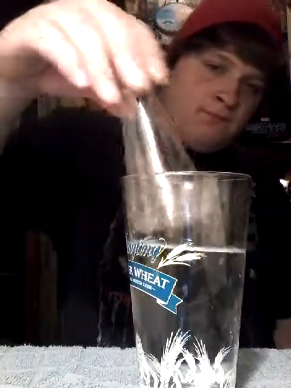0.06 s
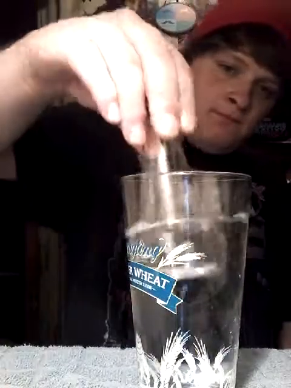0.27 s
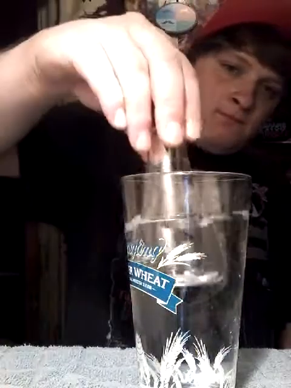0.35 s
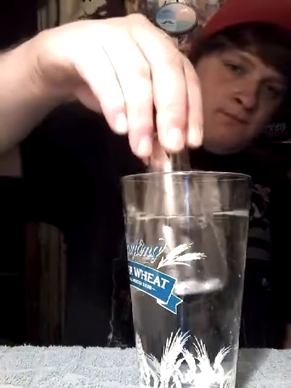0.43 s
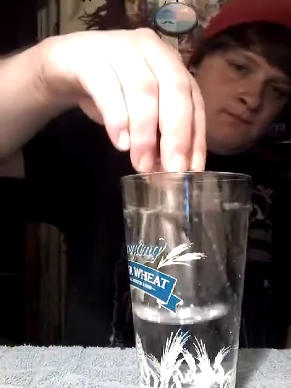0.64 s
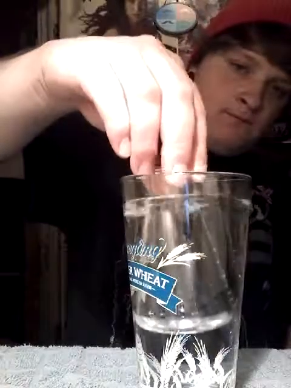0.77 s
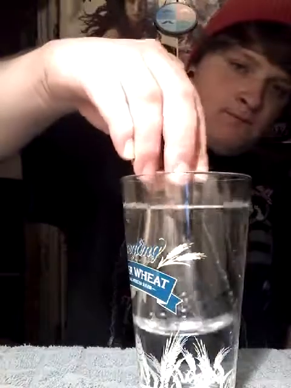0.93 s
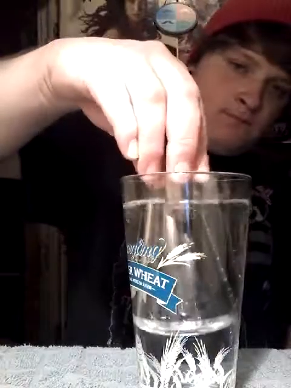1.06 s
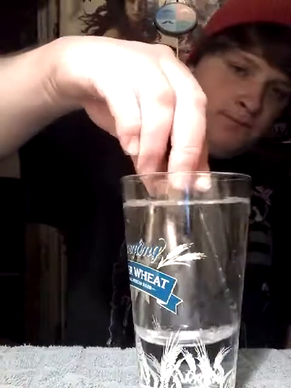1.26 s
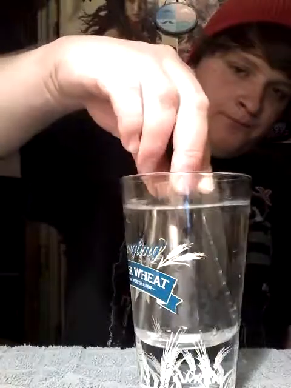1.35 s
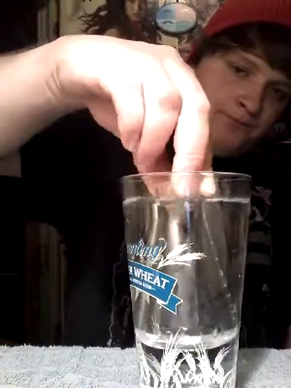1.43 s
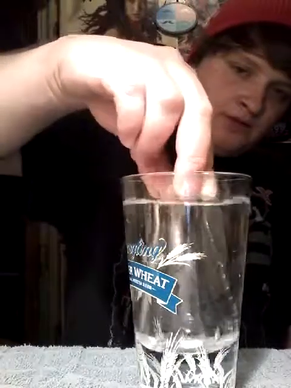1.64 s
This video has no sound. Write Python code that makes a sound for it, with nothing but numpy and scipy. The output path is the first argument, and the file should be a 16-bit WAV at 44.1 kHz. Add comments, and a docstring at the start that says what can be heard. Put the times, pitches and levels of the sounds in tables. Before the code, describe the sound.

One short, chattering glass clink, then soft water gurgles and bubbles in a quiet room.

```python
"""A flask pushed into a glass of water

A small glass flask sinks into a drinking glass of water, clinks on the wall and chatters a few times.
The rising water bends the glass's ringing note down and chokes it; sloshes, fizz, gurgles and a few
small bubbles follow. Behind it a small room hisses quietly, with a low boom that swells and fades."""
import sys
import numpy as np
from scipy import signal
from scipy.fft import rfft, irfft, next_fast_len
from scipy.io import wavfile
from scipy.ndimage import map_coordinates

SR = 44100
rng = np.random.default_rng(int(sys.argv[2]) if len(sys.argv) > 2 else 0)


def output_pcm(signal):
    """Save a mono or channel-first signal as 16-bit PCM at the path in sys.argv[1].

    Samples are clipped to [-1, 1] before scaling.
    """
    pcm = np.clip(np.atleast_2d(signal).T, -1, 1) * 32767
    wavfile.write(sys.argv[1], SR, np.round(pcm).astype(np.int16))


N = 74970

# each touch of flask on glass: t/s, knock/dB, chink/dB, rattle/dB, crack/dB, crack's treble cutoff/Hz
TOUCHES = [(0.2250, -13.5, -30.5, -51, -22.5, 8930), (0.2318, -28.5, -47, -47, -32, 14000),
           (0.2400, -32, -38.5, -41, -33, 15000), (0.2517, -24.5, -50, -34, -30, 4060),
           (0.2623, -22, -50, -36, -30, 4100), (0.2681, -30, -45, -36, -34.5, 5170),
           (0.2734, -35, -47, -34.5, -26, 3000), (0.2803, -38, -56.5, -33, -32, 3000),
           (0.2920, -48, -47.5, -34.5, -29.5, 15200), (0.3325, -51, -56, -53, -48, 4000)]
ATTACK_S, SHARP_ATTACK_S = 0.0004, 0.0002
CHOKE_AT_S = 0.3103  # the water starts to smother the ringing


def clinks():
    """Each touch of the flask on the glass gives a hollow knock, a high chink, a rattle and a crack."""
    # hollow notes of the held flask and the water: f/Hz, level/dB, t60/s (time to fade by 60 dB)
    knock_notes = [(790, -17.5, .06), (903, -18, 0.071), (988, -0.5, 0.064), (1039, 2.5, 0.0203),
                   (1290, -5, 0.04), (1310, -37, 0.022)]
    # high notes of the glass walls: f/Hz, level/dB, t60/s
    chink_notes = [(3255, -3, 0.045), (3996, -19, 0.17), (4380, -1.5, 0.072), (4440, -14, .04),
                   (4772, -12.5, 0.16), (5204, -8, 0.049), (5410, -3.5, 0.035), (5800, -13, 0.026),
                   (6400, -17.5, 0.06), (6810, -10.5, .035), (7520, -9.5, 0.037)]
    # notes of the flask's wall as it rattles along the glass: f/Hz, level/dB
    rattle_notes = [(2550, -6), (2810, -4), (2900, -2), (3190, -7.5), (3310, -8.5)]
    # tone colour of the crack: f/Hz, level/dB
    crack_colour = [(40, -45), (110, -24), (200, -9), (400, 10), (660, 0), (850, -6), (1200, -1),
                    (1650, -17), (2200, -1), (2900, 0), (4000, -2.5), (5500, -4.5), (8500, -13),
                    (12000, -2.5), (16000, -9.5)]
    rattle_t60_s, pitch_spread = 0.042, 0.014
    out, t = np.zeros(N), clock()[:SR // 3]
    for s, knock_db, chink_db, rattle_db, crack_db, cutoff_hz in TOUCHES:
        knock = amp(knock_db) * ring(knock_notes, t, ATTACK_S, scatter_db=0.5)
        chink = amp(chink_db) * ring(chink_notes, t, SHARP_ATTACK_S, scatter_db=1.2)
        # the touching point moves, so each rattle is tuned a little differently
        shifted = [(hz * (1 + pitch_spread * rng.normal()), db, rattle_t60_s) for hz, db in rattle_notes]
        rattle = amp(rattle_db) * ring(shifted, t, ATTACK_S, scatter_db=1.2)
        burst = filtered(noise(crack_colour), lambda hz: 1 / np.sqrt(1 + (hz / cutoff_hz) ** 4))
        crack = amp(crack_db) * unit(burst)[:len(t)] * struck(t, SHARP_ATTACK_S, t60=0.018)
        out[round(s * SR):][:len(t)] += knock + chink + rattle + crack
    return out


def glass_note():
    """The knocks set the glass ringing; the rising water bends the note down and chokes it."""
    note_hz, sag_hz, t60_s, choke_db_per_s = 1860, 83, 0.31, 522
    first_db = TOUCHES[0][1]
    first, *later = [amp(db - first_db) * struck(clock(s), ATTACK_S, t60_s) for s, db, *_ in TOUCHES]
    level = (first + 0.66 * sum(later)) * amp(-24.5 - choke_db_per_s * clock(CHOKE_AT_S))
    water_height = (1 + np.tanh((clock() - 0.303) / 0.0166)) / 2  # climbs from 0 to 1 around 0.303 s
    return level * tone(note_hz - sag_hz * water_height)


def air_hum():
    """The air in the glass hums briefly, kept going by the chatter."""
    hum_hz, t60_s, choke_db_per_s = 492.8, 0.21, 69
    first, *later = [struck(clock(s), ATTACK_S, t60_s) for s, *_ in TOUCHES]
    level = (first + 0.19 * sum(later)) * amp(-35.5 - choke_db_per_s * clock(CHOKE_AT_S))
    return level * tone(np.full(N, hum_hz))


def sloshes():
    """Water shoved aside by the flask makes soft swells of low noise."""
    # each slosh: t/s, half length/s, level/dB
    swells = [(0.28, .025, -38.5), (0.55, 0.016, -49), (1.055, 0.015, -52), (1.607, 0.0085, -47.5),
              (1.645, 0.0114, -54.5), (1.677, 0.024, -53)]
    # tone colour of a slosh: f/Hz, level/dB
    colour = [(30, -35), (45, 2), (80, -9.5), (200, -2), (400, -0.5), (700, -9.5), (1300, -13),
              (2500, -19.5), (5000, -38.5), (15000, -28)]
    return noise(colour) * sum(amp(db) * swell(s, half) for s, half, db in swells)


def fizz():
    """The stirred water fizzes faintly."""
    # each swell of fizz: t/s, half length/s, level/dB
    swells = [(0.395, 0.034, -54.5), (0.57, 0.22, -62)]
    # tone colour of the fizz: f/Hz, level/dB
    colour = [(300, -40), (900, -8), (1300, -2.5), (1900, -8), (2180, 3.5), (2500, -14), (4500, -19.5),
              (5400, -17), (6200, -38), (15000, -18)]
    return noise(colour) * sum(amp(db) * swell(s, half) for s, half, db in swells)


def gurgles():
    """The sinking flask makes short hollow notes that waver in pitch."""
    # each gurgle: t/s, half length/s, f/Hz, level/dB
    notes = [(0.651, .03, 387, -50.5), (0.82, 0.028, 624, -58), (0.992, 0.0313, 613, -55.5),
             (1.157, 0.027, 579.3, -55), (1.377, 0.034, 491.5, -53)]
    wander_hz = 11.3
    return sum(amp(db) * swell(s, half) * tone(hz + wander_hz * wobble(rate=70.76))
               for s, half, hz, db in notes)


def bubbles():
    """Each small bubble rings briefly while its pitch rises."""
    # each bubble: t/s, starting f/Hz, level/dB, t60/s
    notes = [(1.289, 3600, -52, 0.015), (1.5745, 2053, -40, 0.012), (1.680, 555, -41, 0.104)]
    rise_per_s = 4.3  # as a share of the starting pitch
    out = np.zeros(N)
    for s, hz, db, t60 in notes:
        t = clock(s)
        out += amp(db) * struck(t, ATTACK_S, t60) * tone(hz * (1 + rise_per_s * t))
    return out


def room_echo(x):
    """The small room answers x after 4 ms with an echo whose high notes last longest."""
    # how long the echo lasts: f/Hz, t60/s
    fade_times = [(200, 0.19), (1500, 0.23), (5000, 0.37), (14000, 0.75)]
    hz, t, spectrum = signal.stft(rng.standard_normal(SR // 2), SR, nperseg=256)
    fade = amp(-60 * t / along(fade_times, hz)[:, None])
    _, tail = signal.istft(spectrum * fade, SR, nperseg=256)
    delayed = np.pad(tail, (SR // 250, 0)) / np.linalg.norm(tail)
    return signal.fftconvolve(x, delayed)[:N]


def boom():
    """One low, wavering note swells and fades in the background."""
    # rise and fall of the boom: t/s, relative level/dB
    levels = [(0.0, -49), (0.028, -45), (0.06, -62), (0.112, -54), (0.174, -78), (0.268, -43.5),
              (0.322, -43), (0.41, -44), (0.464, -61), (0.558, -45.5), (0.596, -62), (0.62, -49.5),
              (0.748, -71), (0.794, -51), (0.912, -49), (0.984, -63.5), (1.064, -52), (1.088, -65),
              (1.168, -54), (1.24, -68), (1.348, -49.5), (1.434, -56.5), (1.452, -68), (1.528, -42.5),
              (1.586, -58.5), (1.666, -49), (1.7, -81)]
    boom_hz, wander_hz, gain_db = 108.5, 4.7, 1.95
    return amp(gain_db + curve(levels)) * tone(boom_hz + wander_hz * wobble(rate=34.7))


def room_noise():
    """A quiet hiss wavers in level, and a low rumble follows it more gently."""
    # rise and fall of the hiss: t/s, relative level/dB
    levels = [(0, 2), (.03, 4), (.1, -1), (.2, 0.5), (.3, 12), (.41, 4), (.47, 1), (.55, 4), (.65, 3),
              (.72, -3.5), (.77, -0.5), (.81, 3), (.92, 3.5), (1.0, -1), (1.17, 1), (1.26, -2.5),
              (1.37, 2.5), (1.46, -3.5), (1.53, 3.5), (1.7, -0.5)]
    # tone colour of the hiss: f/Hz, level/dB
    hiss_colour = [(150, 2), (500, 1), (720, -9), (1050, -1), (1350, -1.5), (1650, -6), (2200, -7),
                   (3000, -11.5), (4300, -19), (7000, -21), (11000, -16.5), (14000, -18), (15800, -25)]
    # tone colour of the rumble: f/Hz, level/dB
    rumble_colour = [(25, -39), (42, -42), (54, -6.5), (75, -2), (110, -17.5), (150, -3.5), (190, -2.5),
                     (235, -4), (290, 5), (345, 2.5), (420, -7.5), (490, -5), (600, -13), (750, -16),
                     (1000, -60), (2000, -63.5)]
    swing_db = curve(levels)
    hiss = amp(-59 + swing_db) * noise(hiss_colour)
    rumble = amp(-55.5 + 0.69 * swing_db) * noise(rumble_colour)
    return hiss + rumble


def amp(db):
    """Turns decibels into a number to multiply by."""
    return 10 ** (np.asarray(db) / 20)


def unit(x):
    """Scales x to an average strength (rms) of 1."""
    return x / np.sqrt(np.mean(x ** 2) + 1e-20)


def clock(start=0):
    """Seconds since start, zero before it."""
    return np.maximum(np.arange(N) / SR - start, 0)


def along(points, hz):
    """Reads between (f/Hz, value) points, with octaves evenly spaced."""
    f, values = np.transpose(points)
    return np.interp(np.log(hz + 1), np.log(f + 1), values)


def curve(points):
    """Joins (t/s, value) points with straight lines."""
    return np.interp(clock(), *np.transpose(points))


def wobble(rate):
    """A smooth curve through `rate` random values a second."""
    return map_coordinates(rng.standard_normal(1000), [clock() * rate], mode="wrap")


def filtered(x, response):
    """Scales each frequency in x by response(hz)."""
    size = next_fast_len(N + SR // 2)
    return irfft(rfft(x, size) * response(np.fft.rfftfreq(size, 1 / SR)), size)[:N]


def noise(colour):
    """Noise of strength 1 with the given tone colour."""
    return unit(filtered(rng.standard_normal(N), lambda hz: amp(along(colour, hz))))


def struck(t, attack, t60):
    """The level after a blow: a quick rise, then a fall of 60 dB every t60 seconds."""
    return (1 - np.exp(-t / attack)) * amp(-60 * t / t60)


def ring(notes, t, attack, scatter_db):
    """Fading notes, every second one flipped, each a little louder or softer at every blow."""
    out = np.zeros(len(t))
    for k, (hz, db, t60) in enumerate(notes):
        level = amp(db + scatter_db * rng.normal()) * struck(t, attack, t60)
        out += (-1) ** k * level * np.sin(2 * np.pi * hz * t)
    return out


def swell(peak_s, half_s):
    """A smooth rise and fall around peak_s."""
    return np.exp(-((clock() - peak_s) / half_s) ** 2)


def tone(hz):
    """A pure note that follows a pitch curve."""
    return np.sin(2 * np.pi * np.cumsum(hz) / SR)


def scene():
    """Glass and water close by, the room behind, in one channel."""
    near = clinks() + sloshes() + fizz() + gurgles() + bubbles()
    echo = amp(-17) * room_echo(near)
    return (near + glass_note() + air_hum() + echo + boom() + room_noise())[None]


def record(dry):
    """Cuts away the deep bass and the very highest treble."""
    low_cut_hz, top_hz = 47, 16100
    thinned = signal.sosfilt(signal.butter(4, low_cut_hz, "highpass", fs=SR, output="sos"), dry)
    return np.array([filtered(channel, lambda hz: hz < top_hz) for channel in thinned])


dry = scene()
out = record(dry)
output_pcm(out)
```